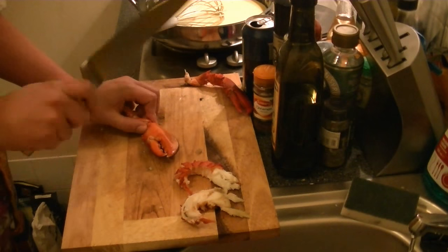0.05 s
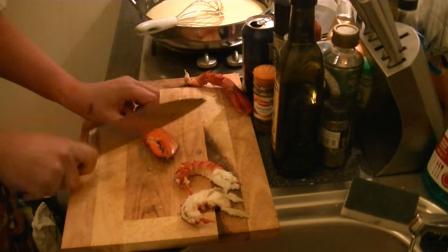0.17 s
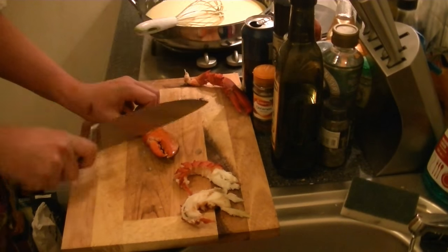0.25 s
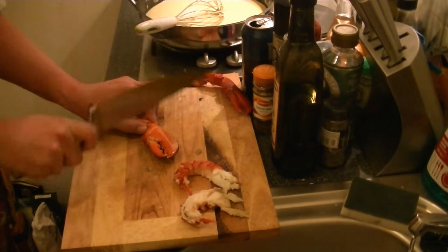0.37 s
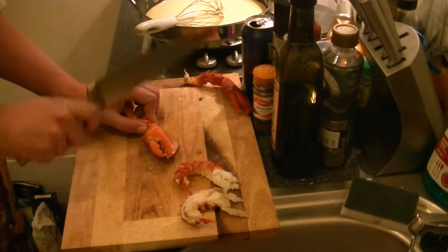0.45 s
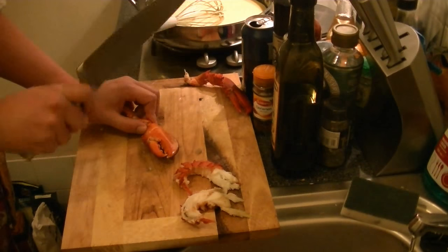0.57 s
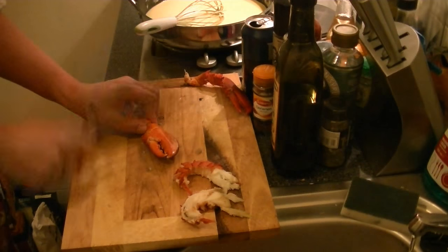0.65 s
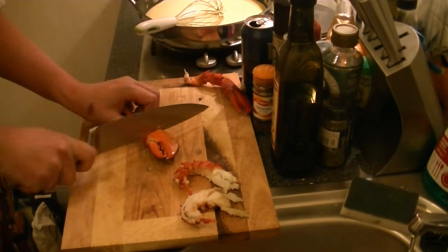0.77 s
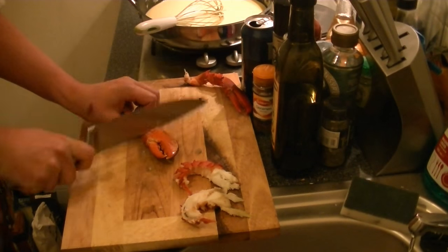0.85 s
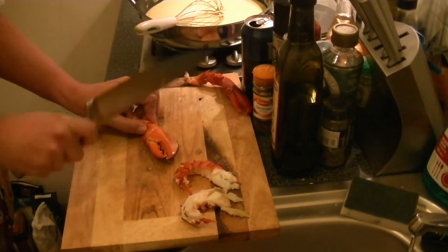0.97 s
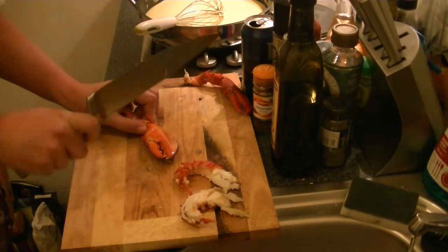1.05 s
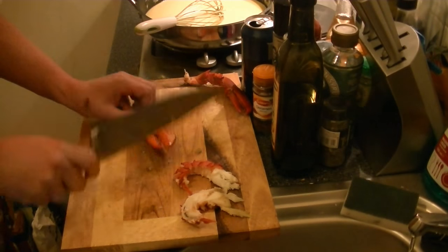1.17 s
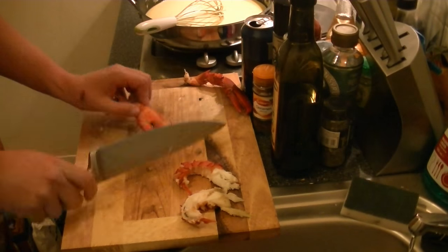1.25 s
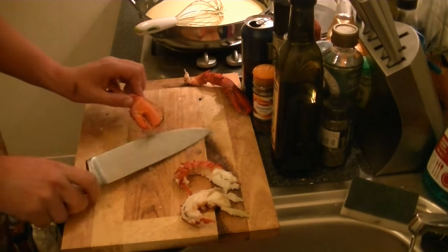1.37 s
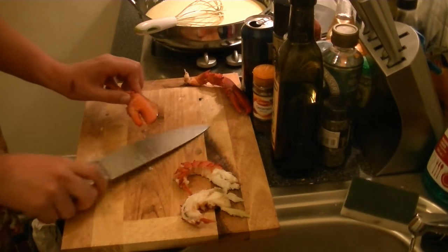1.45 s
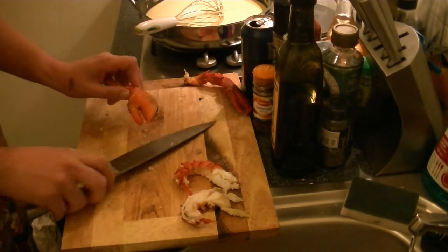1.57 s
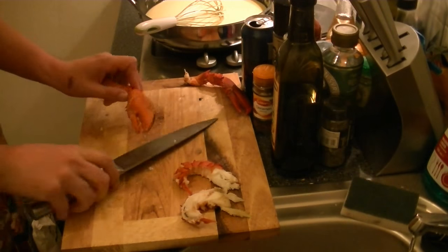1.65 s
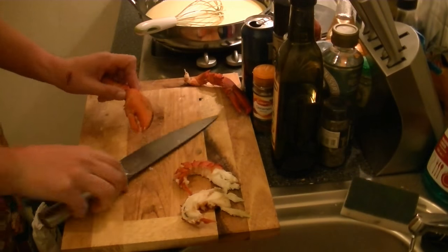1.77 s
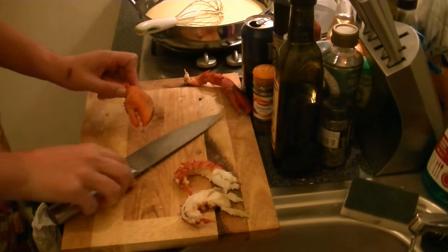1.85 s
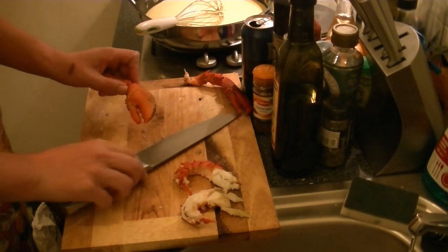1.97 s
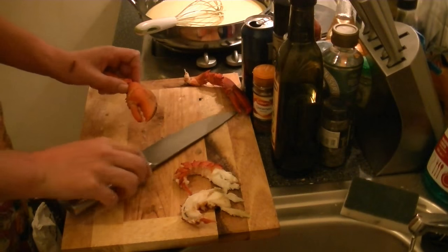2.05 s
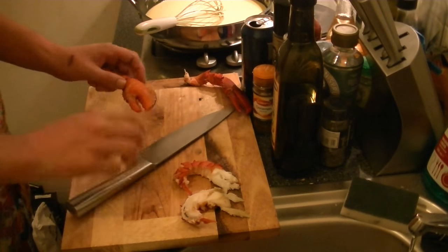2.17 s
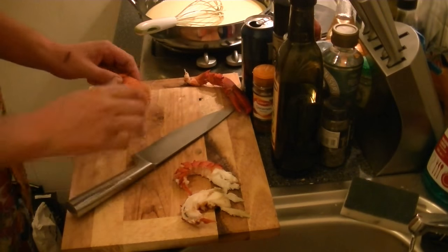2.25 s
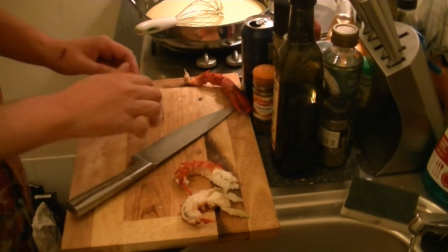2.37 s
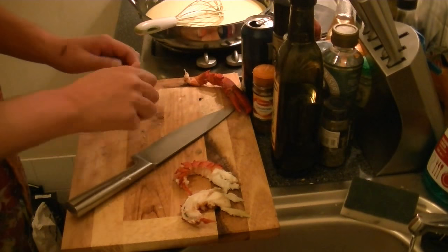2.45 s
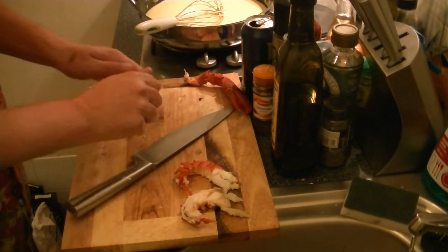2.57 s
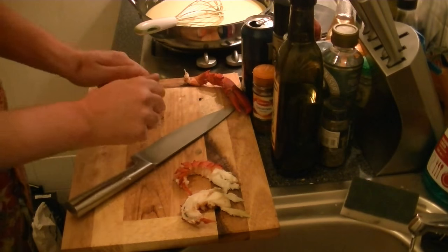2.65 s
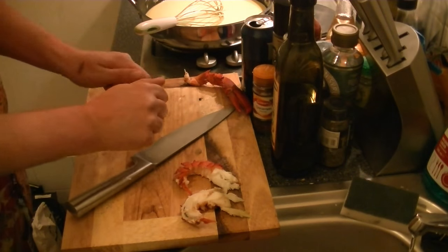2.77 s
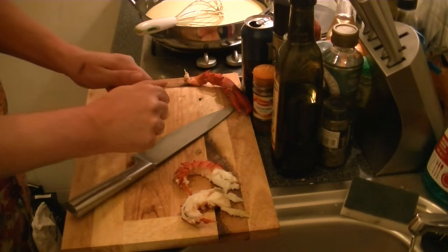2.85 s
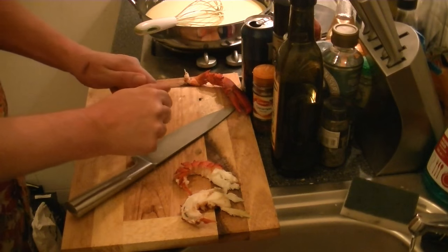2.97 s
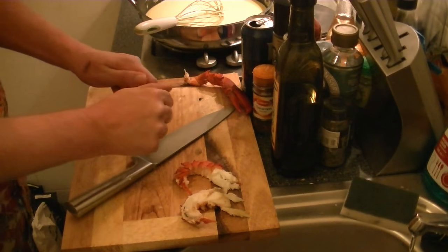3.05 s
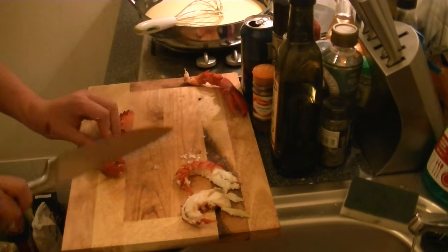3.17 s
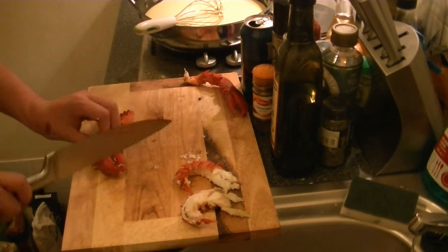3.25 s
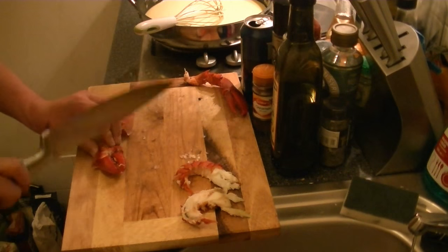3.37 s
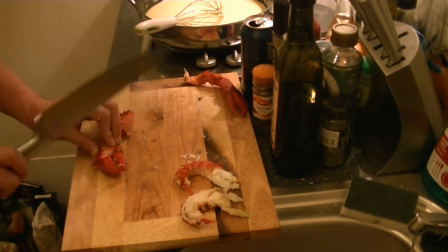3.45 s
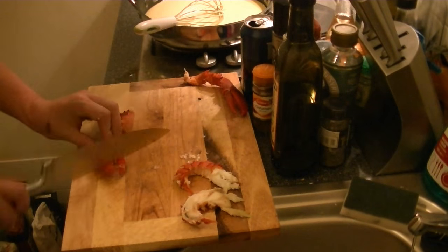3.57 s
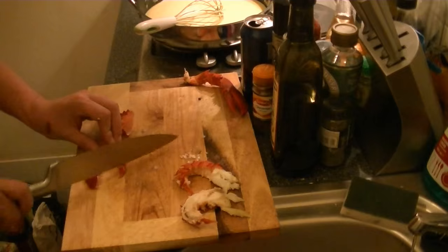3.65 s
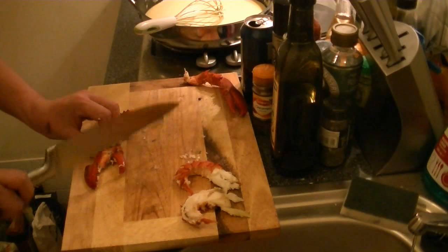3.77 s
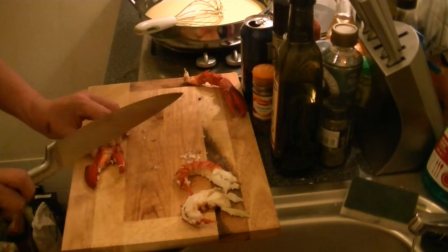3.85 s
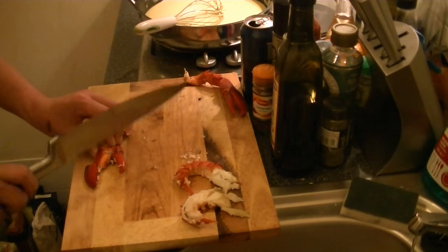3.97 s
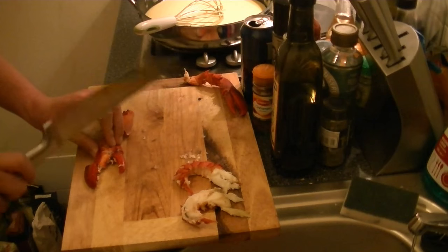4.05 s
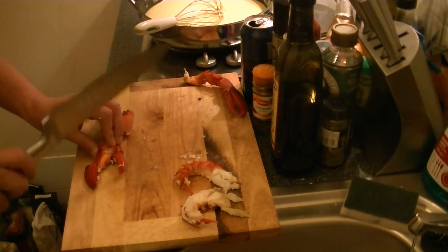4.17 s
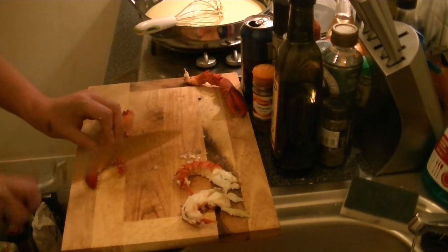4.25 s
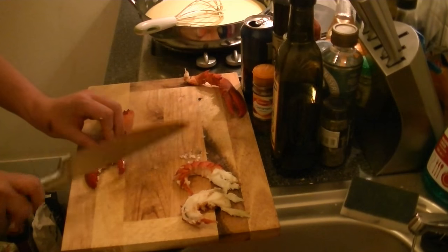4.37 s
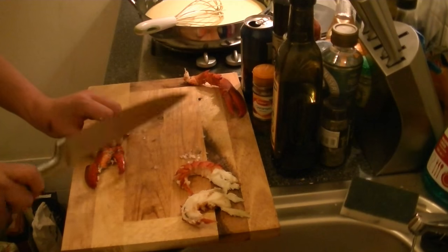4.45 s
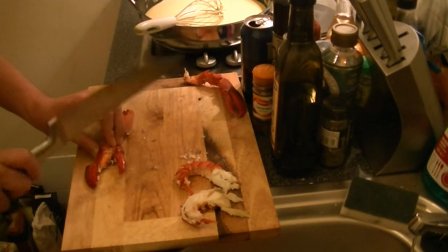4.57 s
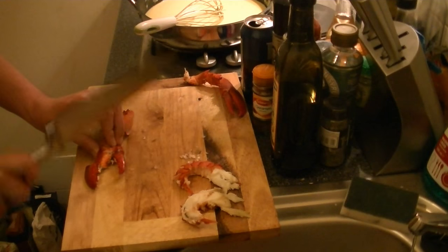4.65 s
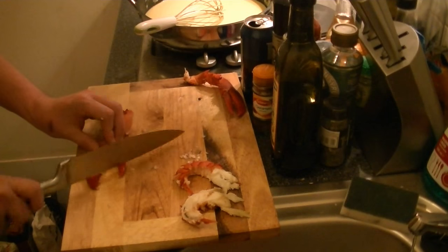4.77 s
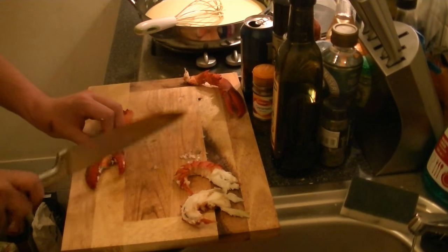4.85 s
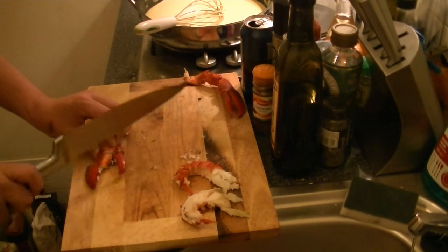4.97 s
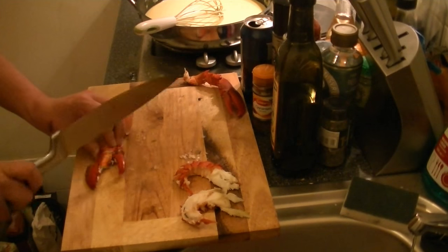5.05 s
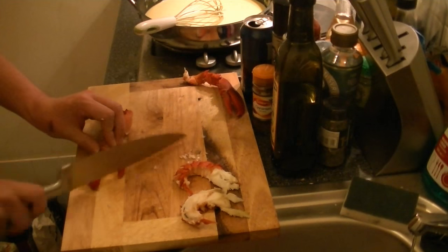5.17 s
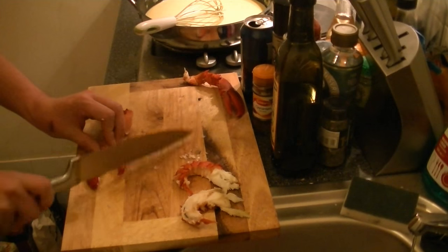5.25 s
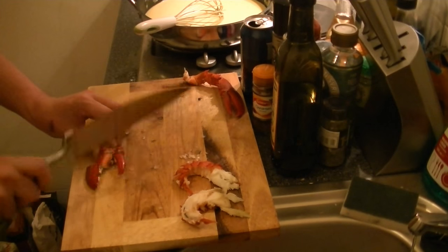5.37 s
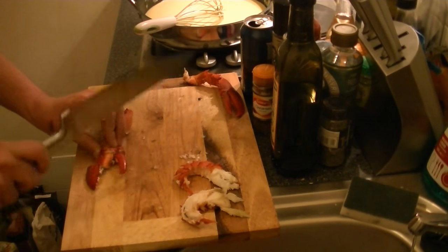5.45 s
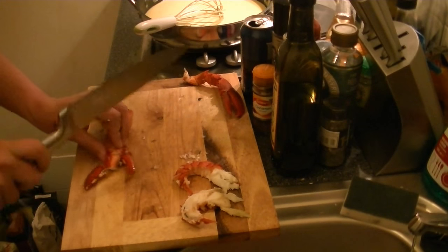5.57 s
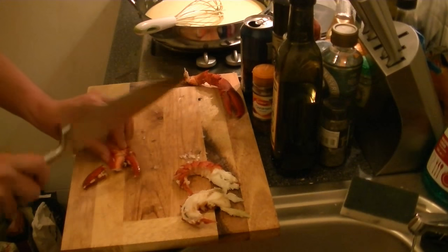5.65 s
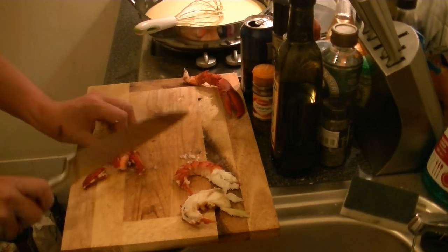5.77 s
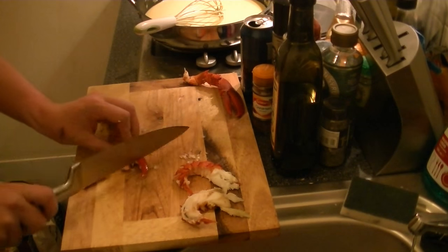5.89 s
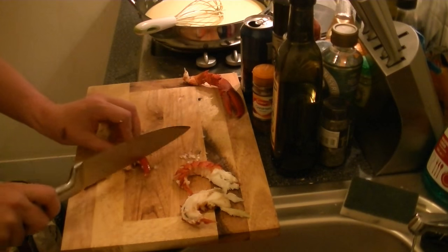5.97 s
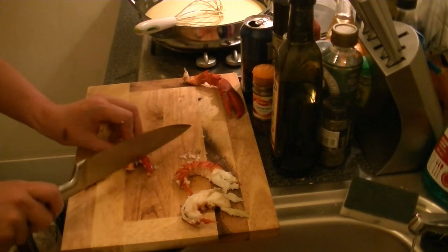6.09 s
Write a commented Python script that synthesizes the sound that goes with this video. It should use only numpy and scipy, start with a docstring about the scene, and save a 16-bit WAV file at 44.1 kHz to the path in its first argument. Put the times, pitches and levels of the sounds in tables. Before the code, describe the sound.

A knife's blunt spine strikes claws on a thick board: two sharp cracks, a quieter passage of small steel contacts, a grainy blade scrape and bright shell snaps over dull bubbling pops. Then another blow, a hollow tok, and four heavy, splintering thuds with short boxy room tails. Thin steel singing appears between them. Everything is near, dry-ish and slightly distorted by the loudest hits, above low kitchen hiss.

```python
"""Cracking lobster claws with a knife

The back of a heavy steel knife cracks claws on a wooden board in a small, hard-walled kitchen: noise bursts
through thud, knock and shell spectra, plus ringing modes of board, counter and steel. An unbroken claw answers
with a hollow tok (modes). Between blows the knife is laid down and slides (grainy noise), shell snaps in the
fingers (noise humps), a pan ticks on the hob (bubble bursts). The blows overload the nearby mono microphone.
"""
import sys
import numpy as np
from scipy import signal
from scipy.fft import rfft, irfft, next_fast_len
from scipy.io import wavfile
from scipy.ndimage import uniform_filter1d

SR = 44100
rng = np.random.default_rng(int(sys.argv[2]) if len(sys.argv) > 2 else 0)


def write(x):
    x = np.atleast_2d(x).T
    wavfile.write(sys.argv[1], SR, np.round(np.clip(x, -1, 1) * 32767).astype(np.int16))


N = 269892
T = np.arange(24000) / SR  # time axis of one event [s]

# Levels are relative: sources add offsets, and spectra are scaled to rms 1.
# Kitchen background noise: (frequency [Hz], density [dB per Hz])
AIR_SPECTRUM = [(18, -66.5), (30, -8), (153, -14), (303, 6), (394, -6), (666, 7.5), (889, -18), (1220, 1.5),
                (1460, -11), (2290, -11), (2830, -11), (4650, -11.5), (8740, -17), (16000, -27.5)]
# Room decay: (frequency [Hz], t60 [s])
KITCHEN_T60 = [(100, 0.48), (260, 0.36), (700, 0.39), (1840, 0.31), (4850, 0.33), (8000, 0.29),
               (14000, 0.2)]

# Pan tick spectrum: (frequency [Hz], density [dB per Hz])
PAN_SPECTRUM = [(100, -38), (300, -3), (440, -15.5), (660, 2), (1000, -2.5), (1400, -3.5), (1700, -2),
                (2350, 1.5), (2750, -8), (3600, -11.5), (6000, -18), (12000, -50)]
# Mean level of the small bubbles: (time [s], level [dB])
SIMMER_LEVEL = [(0, -36), (1, -36), (1.8, -37), (2.3, -38), (3.1, -34.5), (3.5, -41.5), (4.2, -42),
                (5, -42.5), (5.6, -38.5), (6.12, -47)]
# Biggest bubbles: (time [s], level [dB])
BIG_BUBBLES = [(0.522, -24.5), (.575, -22.5), (0.661, -24), (1.111, -24.5), (1.146, -23), (1.196, -21.5),
               (1.285, -27.5), (1.32, -22.5), (1.565, -23), (2.207, -25.5), (2.276, -22.5), (2.335, -16.5),
               (2.676, -22), (2.821, -28.5), (2.874, -24), (2.909, -24), (3.137, -23.5)]
SMALL_PER_S, SMALL_SPREAD_DB = 36, 2.5
MEDIUM_PER_S, MEDIUM_DB, MEDIUM_SPREAD_DB = 17, 6.5, 2
# Spit against tick at full bubble size; extra dB lost per dB below that size
SPIT_DB, SPIT_FULL_DB, SPIT_DB_PER_DB = -17.5, -25, 1

# Blade sliding over wood and shell: (middle [s], length [s], level [dB])
SLIDE_STROKES = [(1.952, 0.17, -43.5), (3.427, 0.029, -44), (5.071, 0.089, -46.5)]
# Slide hiss: (frequency [Hz], density [dB per Hz])
SLIDE_SPECTRUM = [(80, -36), (200, -6.5), (1500, 1), (2500, 0), (3100, 2), (4000, 4), (4550, 5.5),
                  (5200, -4.5), (7000, -7), (8500, -8.5), (10500, -7), (16000, -19)]

# Shell snaps: (time [s], level [dB], pitch [Hz], width [octaves])
SHELL_SNAPS = [(0.86, -16, 3650, 0.97), (1.319, -26, 8150, 0.49), (1.59, -25.5, 6960, 0.54),
               (1.689, -24.5, 6000, 0.7), (2.337, -23, 6600, 0.69), (2.422, -30, 6500, 0.75),
               (2.726, -31, 11000, 0.51), (2.932, -35, 9400, 0.47), (3.144, -25.5, 6500, 0.38),
               (4.15, -32, 5250, 0.24), (6.087, -35.5, 3700, 0.56)]
# Light touches of steel and shell that ping: (time [s], level [dB], pitch [Hz])
TOUCH_PINGS = [(.935, -21.5, 4550), (1.023, -35, 4570), (3.011, -41, 4520), (3.081, -31.5, 4570),
               (3.175, -27, 4300), (3.940, -22, 7640), (4.051, -25, 2020), (5.890, -18, 4280)]

# Blade ringing once lifted clear: (time [s], level [dB], rise [s])
BLADE_RINGS = [(0, -50, 0.0051), (3.332, -45.5, 0.062), (3.738, -21.5, 0.13), (4.4, -32, 0.069),
               (5.339, -34, 0.059), (5.89, -42, 0.025)]
# Free blade modes: (frequency [Hz], level [dB], t60 [s])
BLADE_MODES = [(4503, 6.5, 0.6), (2993, 4, 0.23), (7340, -11, 0.33)]

# Taps on an unbroken claw: (time [s], level [dB], pitch [Hz], cavity against shell [dB])
CLAW_TAPS = [(3.5805, -11, 1000, 3), (5.889, -13, 890, -20)]
# Claw shell modes: (multiple of its pitch, level [dB], t60 [s])
CLAW_MODES = [(1, 0, 0.065), (1.6, -8, 0.093), (2.32, 4.5, 0.037), (6.1, -17, 0.075)]
# The air inside rings about an octave under the shell
CAVITY_MULTIPLE, CAVITY_T60_S = .505, .08

# Knife contacts: (time [s], thud [dB], thud pitch [Hz], knock [dB], shell crack [dB],
# splinter [dB], steel clank [dB])
KNIFE_BLOWS = [(0.2206, -2.5, 685, -3.5, -5, -9.5, -41), (0.7237, -6, 643, -4.5, -4, -4, -18),
               (1.407, -19, 710, -19.5, -36.5, -62, -23), (1.439, -27, 680, -19.5, -35, -58, -25.5),
               (1.830, -21.5, 1050, -32.5, -66, -70, -56), (2.080, -32.5, 590, -32, -37, -45, -36.5),
               (2.127, -36.5, 523, -35, -45, -58, -48), (3.1922, -8, 650, -7.5, -2.5, -18, -29.5),
               (3.5801, -16.5, 515, -10.5, -25, -33.5, -35), (3.630, 0, 653, 5, 10, 0.5, -11),
               (4.314, 0.5, 653, 7, 3, -3, -32), (4.755, 0, 614, 8, 6, -1, -25),
               (5.190, 0.5, 630, 6.5, 4.5, -3, -20), (5.8886, -29.5, 920, -17, -25.5, -36, -37)]
# Board modes: (frequency [Hz], level [dB], t60 [s])
BOARD_MODES = [(458.4, -11.5, 0.42), (503, -35, 0.95), (642, -17.5, 0.45), (713, -9.5, 0.38),
               (774, -16, 0.42), (893, -9, 0.28), (1033, -13.5, 0.23), (1367, -18.5, 0.4),
               (1430, -57, 0.18), (1556, -19, 0.43), (2005, -28, 0.13), (2920, -43, 0.78)]
# Counter modes: (frequency [Hz], level [dB], t60 [s])
COUNTER_MODES = [(116.4, -24, 0.36), (246, -28, 0.4), (311, -18, 0.41), (340.6, -11, 0.24)]
# Gripped knife modes: (frequency [Hz], level [dB], t60 [s])
STEEL_MODES = [(731, 8, 0.046), (1577, -10, 0.54), (2320, 4.5, 0.19), (2920, -23, 0.12), (3220, -3, 0.28),
               (3320, 2.5, 0.15), (3650, -7, 0.48), (4400, -10.5, 0.17), (5200, -12, 0.22),
               (5730, -22, 0.25)]
# Low boom of the shaken counter: (frequency [Hz], density [dB per Hz])
BOOM_SPECTRUM = [(30, -14), (90, -8), (130, -3), (200, -5), (330, 2.5), (500, 2), (1500, -61)]
# Cracking shell: (frequency [Hz], density [dB per Hz])
CRACK_SPECTRUM = [(200, -50), (1500, -19), (2800, 0.5), (3600, 1.5), (4400, -1), (5200, -4), (6500, -5.5),
                  (9000, -19.5), (16000, -54)]
# Splintering shell, also the bubbles' spit: (frequency [Hz], density [dB per Hz])
SPLINTER_SPECTRUM = [(500, -50), (4000, -1.5), (7000, 1.5), (10000, -0.5), (13000, -3), (16000, -9)]
BREAK_DB = -9.5  # a crack this loud breaks through
KNOCK_HZ, CONTACT_T60_S = 1637, .035
CRUNCH_DB, CRUNCH_S = 5, 0.0016  # jerks of the yielding shell: depth (standard deviation), spacing

CLIP_PEAK = .95
TOP_HZ, EDGE_HZ = 16100, 700  # treble cutoff: middle and width of its slope


def amp(db):
    """Decibels to gain."""
    return 10 ** (np.asarray(db) / 20)


def unit(x):
    """x at rms 1."""
    return x / np.sqrt(np.mean(x ** 2) + 1e-20)


def along(points, hz):
    """(Hz, value) points interpolated on a log frequency axis."""
    point_hz, value = np.transpose(points)
    return np.interp(np.log(hz + 1), np.log(point_hz), value)


def fade(t60_s):
    """Exponential decay, 60 dB in t60_s."""
    return np.exp(-np.log(1000) * T / np.maximum(t60_s, 1e-4))


def onset(rise_s):
    """Exponential rise towards 1."""
    return 1 - np.exp(-T / rise_s)


def add(track, time_s, sound):
    """Mix a sound into a track at time_s."""
    start = max(round(time_s * SR), 0)
    part = sound[:max(len(track) - start, 0)]
    track[start:start + len(part)] += part


def filtered(x, response):
    """x filtered by a function of frequency, zero-padded."""
    size = next_fast_len(len(x) + 4096, True)
    return irfft(rfft(x, size) * response(np.fft.rfftfreq(size, 1 / SR)), size)[:len(x)]


def shaped(x, gain):
    """x filtered by a sampled response of its own length."""
    return irfft(rfft(x) * gain)


def highpass(x, order, cutoff_hz):
    """Butterworth high-pass."""
    return signal.sosfilt(signal.butter(order, cutoff_hz, "high", fs=SR, output="sos"), x)


def noise(spectrum, size):
    """Coloured noise of rms 1."""
    return unit(filtered(rng.standard_normal(size), lambda hz: amp(along(spectrum, hz))))


def band(hz, pitch_hz, width_oct):
    """Spectral hump around a pitch, with steep skirts."""
    return 1 / (1 + (np.log2((hz + 1) / pitch_hz) / width_oct) ** 4)


def hump(pitch_hz, width_oct):
    """Noise of rms 1 around a pitch."""
    return unit(filtered(rng.standard_normal(len(T)), lambda hz: band(hz, pitch_hz, width_oct)))


def uneven(hz, depth_db, spacing_hz=170):
    """Random small peaks and dips of a response, drawn anew each call."""
    knots = rng.standard_normal(400)
    return amp(depth_db * np.interp(hz / spacing_hz, np.arange(len(knots)), knots))


def causal(gain):
    """Minimum-phase response with this gain: nothing sounds before the blow."""
    cepstrum = irfft(np.log(np.maximum(gain, gain.max() * 1e-4)))
    half = len(cepstrum) // 2
    return np.exp(rfft(np.r_[cepstrum[0], 2 * cepstrum[1:half], np.zeros(half)]))


def ring(modes, scatter_db, detune):
    """Damped modes with random strength and phase; grip and load shift their pitch a little."""
    hz, db, t60_s = np.array(modes, np.float32).T[:, :, None]
    gain = amp(db[:, 0] + scatter_db * rng.uniform(-0.23, 1, len(db)))
    hz = hz * (1 + detune * rng.standard_normal(hz.shape, np.float32))
    t = T.astype(np.float32)
    phase = rng.random(hz.shape, np.float32)  # cycles
    return gain @ (10 ** (-3 * t / t60_s) * np.sin(2 * np.pi * (hz * t + phase)))


def dying(x, build_s):
    """The walls' answer to a noise: it builds up quickly and dies band by band."""
    hz, t, bands = signal.stft(x, SR, nperseg=256)
    decay = np.exp(-np.log(1000) * t / along(KITCHEN_T60, hz)[:, None])
    tail = signal.istft(bands * decay, SR, nperseg=256)[1][:len(T)]
    return tail * onset(build_s)


def kitchen(x, wet_db):
    """Direct sound plus the room's noise-like tail."""
    tail = dying(rng.standard_normal(len(T)), build_s=0.0044)
    return x + amp(wet_db) * signal.fftconvolve(x, tail / np.linalg.norm(tail))[:len(x)]


def air():
    """Steady coloured noise of the kitchen."""
    return amp(-52.5) * noise(AIR_SPECTRUM, size=N)


def bubbles(per_s, spread_db):
    """Times and levels of bubbles bursting unevenly at a mean rate, following the simmer's strength."""
    slots = np.arange(int(per_s * N / SR))
    when, size = rng.random((SR, 2))[slots].T
    time_s = (slots + when) / per_s
    scatter_db = spread_db * np.sqrt(12) * (size - .5)  # standard deviation spread_db
    return time_s, np.interp(time_s, *np.transpose(SIMMER_LEVEL)) + scatter_db


def crackle(time_s, db, spectrum, t60_s, room_db):
    """Tiny noise bursts with faint room tails; their powers add, and they carry little bass."""
    power = np.bincount((np.abs(time_s) * SR).astype(int), amp(db) ** 2, N)[:N]
    power_decay = fade(t60_s) ** 2 + (amp(room_db) * fade(0.16)) ** 2
    envelope = np.sqrt(np.abs(signal.fftconvolve(power, power_decay)[:N]))
    bursts = envelope * rng.standard_normal(N)
    colour = unit(amp(along(spectrum, np.fft.rfftfreq(len(T), 1 / SR))))
    body = irfft(causal(colour))
    return highpass(signal.fftconvolve(bursts, body)[:N], 3, 220)


def pan():
    """Bubbles collapse against the pan with dull ticks; larger ones spit more brightly, up to full size."""
    big_s, big_db = np.transpose(BIG_BUBBLES)
    small_s, small_db = bubbles(SMALL_PER_S, SMALL_SPREAD_DB)
    medium_s, medium_db = bubbles(MEDIUM_PER_S, MEDIUM_SPREAD_DB)
    time_s = np.r_[big_s, medium_s, small_s]
    tick_db = np.r_[big_db, medium_db + MEDIUM_DB, small_db]
    spit_db = tick_db + SPIT_DB + SPIT_DB_PER_DB * np.minimum(tick_db - SPIT_FULL_DB, 0)
    ticks = crackle(time_s, tick_db, PAN_SPECTRUM, t60_s=0.0071, room_db=-11.5)
    spits = crackle(time_s, spit_db, SPLINTER_SPECTRUM, t60_s=0.037, room_db=-6.5)
    return ticks + spits


def slides():
    """The blade drags with a grainy hiss, streaked by its resonances, that swells and stops."""
    t = np.arange(N) / SR
    stroke = np.zeros(N)
    for middle_s, length_s, db in SLIDE_STROKES:
        stroke += amp(db) * np.cos(np.pi * np.clip((t - middle_s) / length_s, -.5, .5)) ** 2
    grain = amp(3.6 * unit(uniform_filter1d(rng.standard_normal(N), size=90)))
    streaks = lambda hz: uneven(hz, depth_db=7, spacing_hz=108)
    hiss = unit(filtered(noise(SLIDE_SPECTRUM, size=N), streaks))
    return kitchen(stroke * grain * hiss, wet_db=0.5)


def chips():
    """Brittle shell: noise snaps as it breaks, short pings as it touches something hard."""
    out = np.zeros(N)
    for time_s, db, pitch_hz, width_oct in SHELL_SNAPS:
        snap = hump(pitch_hz, width_oct) * fade(0.022)
        room = amp(-15) * dying(hump(pitch_hz, width_oct), build_s=0.0022)
        add(out, time_s, amp(db) * (snap + room))
    for time_s, db, pitch_hz in TOUCH_PINGS:
        tone = np.sin(2 * np.pi * pitch_hz * T) * fade(0.02) * onset(0.00091)
        room = dying(hump(pitch_hz, width_oct=0.28), build_s=0.0025)
        add(out, time_s, amp(db + 6.5) * tone + amp(db - 20.5) * room)
    return out


def blade():
    """The free steel blade sings in a few high damped modes, swelling in linearly."""
    out = np.zeros(N)
    note = sum(amp(db) * fade(t60_s) * np.sin(2 * np.pi * hz * T) for hz, db, t60_s in BLADE_MODES)
    for time_s, db, rise_s in BLADE_RINGS:
        add(out, time_s, amp(db) * note * np.minimum(T / max(rise_s, 1e-3), 1))
    return out


def claw():
    """An unbroken claw answers a tap with a hollow tok: shell modes and its air cavity."""
    out = np.zeros(N)
    for time_s, db, pitch_hz, cavity_db in CLAW_TAPS:
        multiples = CLAW_MODES + [(CAVITY_MULTIPLE, cavity_db, CAVITY_T60_S)]
        modes = [(multiple * pitch_hz, mode_db, t60_s) for multiple, mode_db, t60_s in multiples]
        tok = ring(modes, scatter_db=1.5, detune=.005)
        add(out, time_s, amp(db) * tok * onset(0.00068))
    return kitchen(out, wet_db=-11.5)


def blows():
    """Each contact is a short burst of thud, knock and cracking shell that fills the room; solids ring on."""
    out = np.zeros(N)
    hz = np.fft.rfftfreq(len(T), 1 / SR)
    spectra = (CRACK_SPECTRUM, SPLINTER_SPECTRUM, BOOM_SPECTRUM)
    crack, splinter, boom = (unit(amp(along(points, hz))) for points in spectra)
    knock = unit(band(hz, KNOCK_HZ, width_oct=0.78))
    for time_s, thud_db, thud_hz, knock_db, crack_db, splinter_db, steel_db in KNIFE_BLOWS:
        # blows that do not break the shell shake the counter less
        heavy = amp(thud_db - 1.5 + min(crack_db - BREAK_DB, 0))
        thud = unit(band(hz, thud_hz, width_oct=0.65))
        parts = [amp(thud_db) * thud, amp(knock_db) * knock, amp(crack_db) * crack,
                 amp(splinter_db) * splinter, amp(-8) * heavy * boom]
        colour = np.linalg.norm(parts, axis=0) * uneven(hz, depth_db=2.5)
        jerks = amp(CRUNCH_DB * np.interp(T / CRUNCH_S, np.arange(SR), rng.standard_normal(SR)))
        crush = rng.standard_normal(len(T)) * jerks * fade(CONTACT_T60_S)
        add(out, time_s, shaped(crush, causal(colour)))
        room = amp(-6) * dying(shaped(rng.standard_normal(len(T)), colour), build_s=0.0045)
        # doubled lists: board and knife modes come in close pairs that beat
        board = amp(thud_db - 5.5) * ring(BOARD_MODES + BOARD_MODES, scatter_db=6, detune=0.0186)
        counter = heavy * ring(COUNTER_MODES, scatter_db=4.5, detune=0.0062)
        steel = amp(steel_db - 7.5) * ring(STEEL_MODES + STEEL_MODES, scatter_db=8.5, detune=.018)
        add(out, time_s, room + (board + counter) * onset(0.013) + steel * onset(0.00073))
    return out


def scene():
    """All sources at one microphone, on two identical channels."""
    mono = air() + pan() + slides() + chips() + blade() + claw() + blows()
    return np.array([mono, mono])


def record(dry, limit_db=-5, follow_s=0.0023):
    """The microphone loses deep bass; a fast limiter holds the blows down and their peaks still clip."""
    x = highpass(dry.mean(axis=0), 2, 65)
    keep = np.exp(-1 / (follow_s * SR))
    level = np.sqrt(signal.lfilter([1 - keep], [1, -keep], x ** 2))
    limited = x / np.maximum(level / amp(limit_db), 1) ** 0.88
    clipped = limited / (1 + np.abs(limited / CLIP_PEAK) ** 8) ** (1 / 8)

    def response(hz):
        """Treble cutoff and a first-order 12 Hz high-pass."""
        treble = np.clip((TOP_HZ - hz) / EDGE_HZ + .5, 0, 1)
        return treble * 1j * hz / (1j * hz + 12)

    out = filtered(clipped, response)
    return np.array([out, out])


dry = scene()
out = record(dry)
write(out)
```